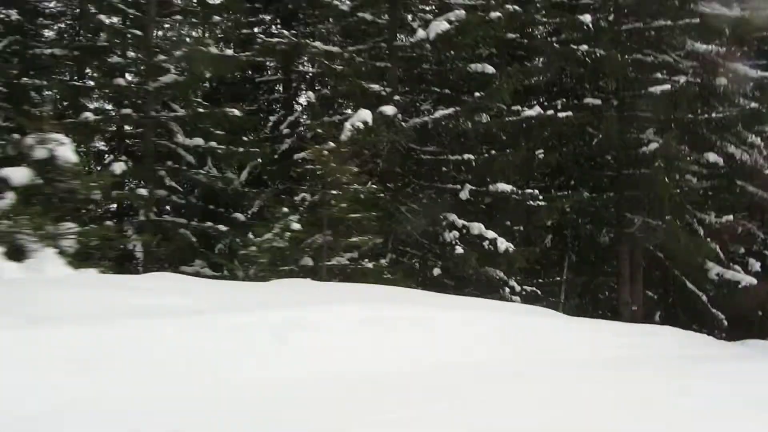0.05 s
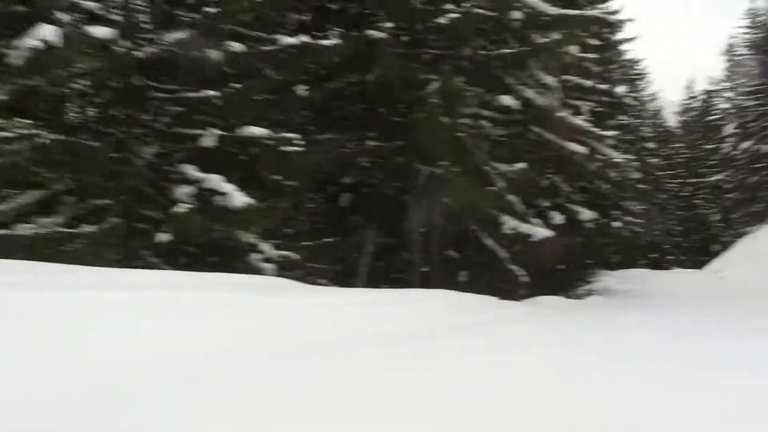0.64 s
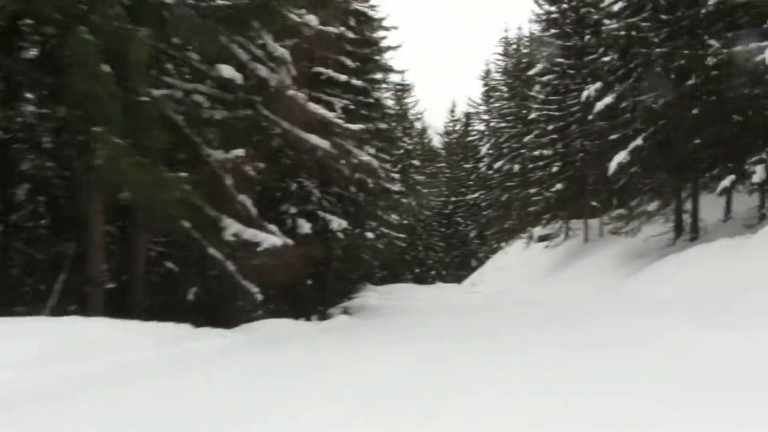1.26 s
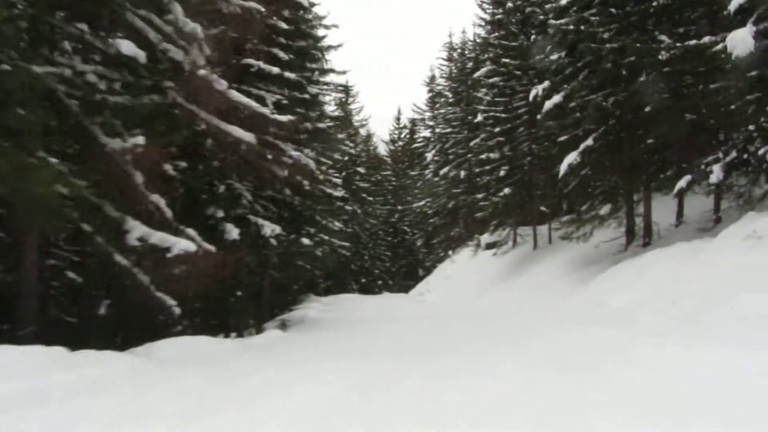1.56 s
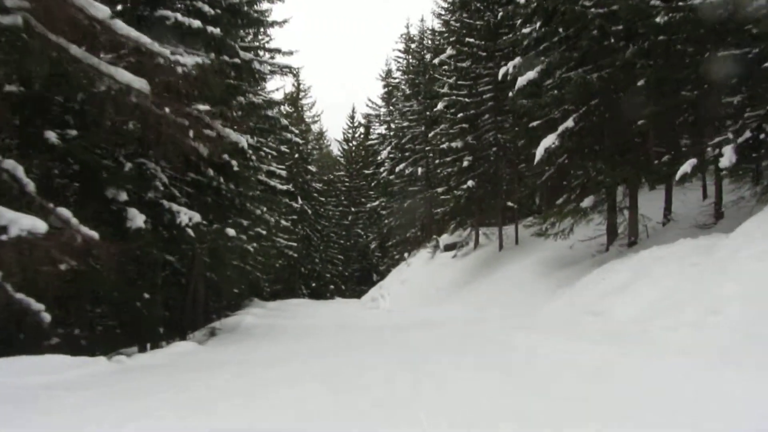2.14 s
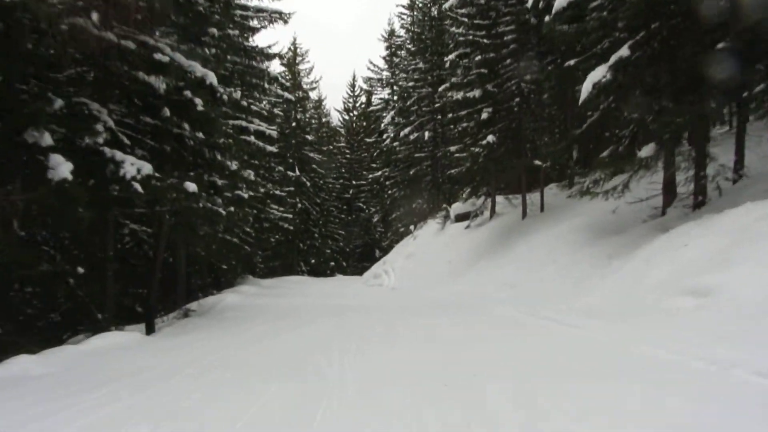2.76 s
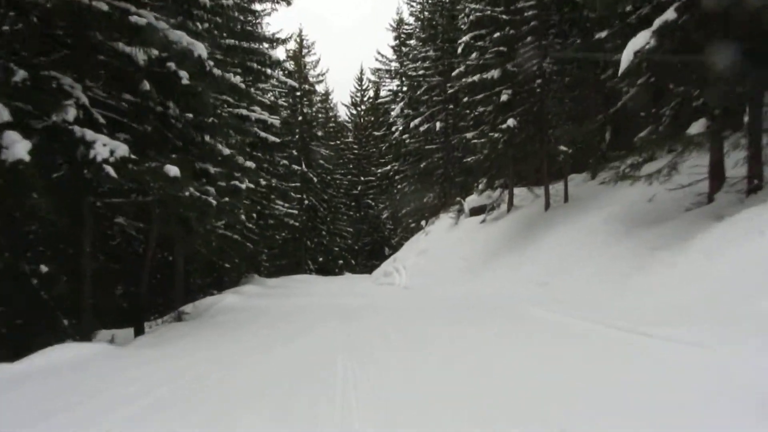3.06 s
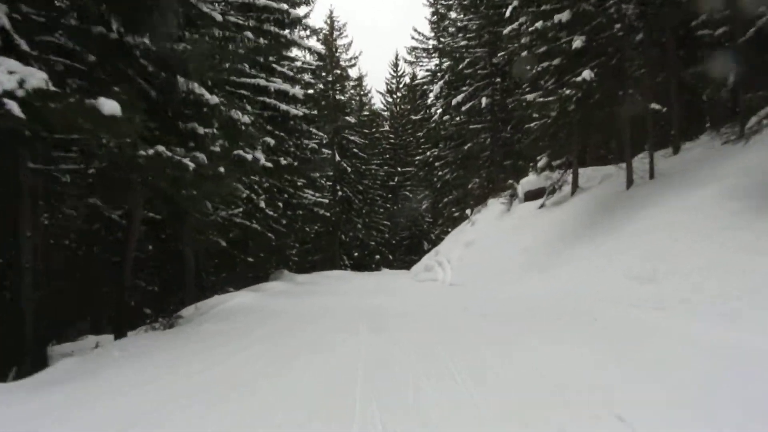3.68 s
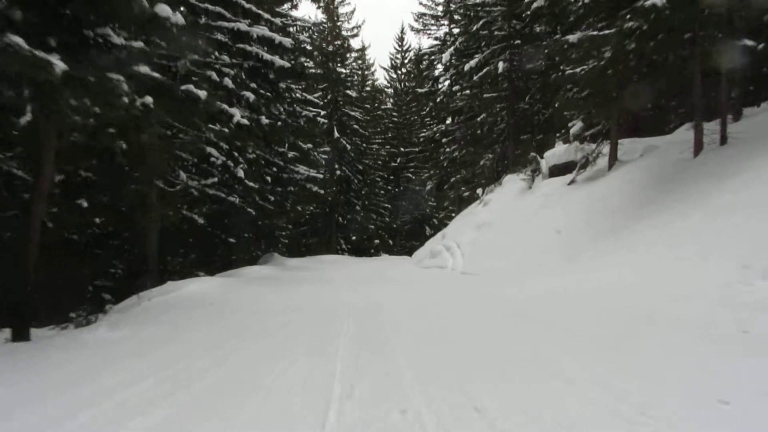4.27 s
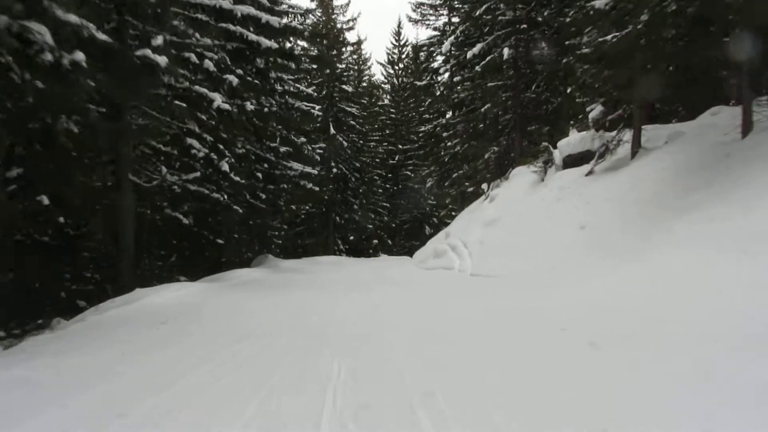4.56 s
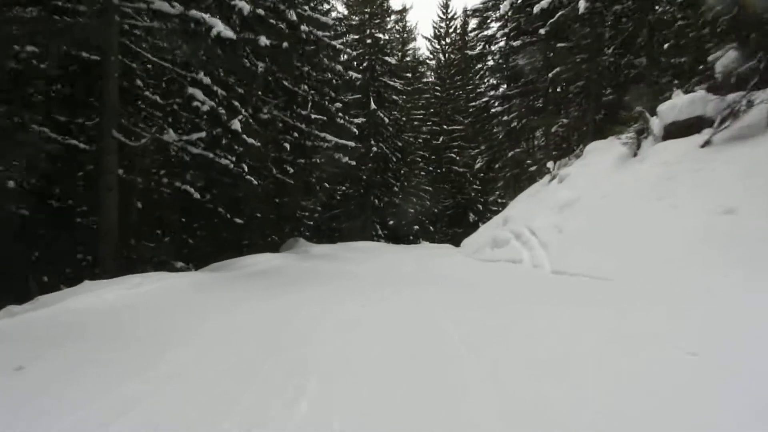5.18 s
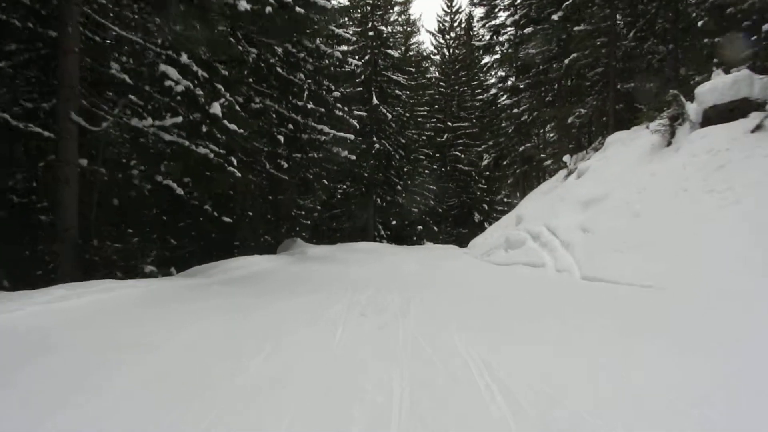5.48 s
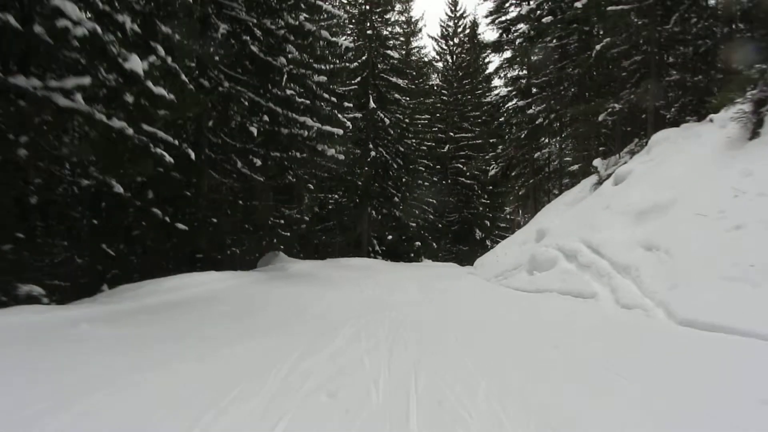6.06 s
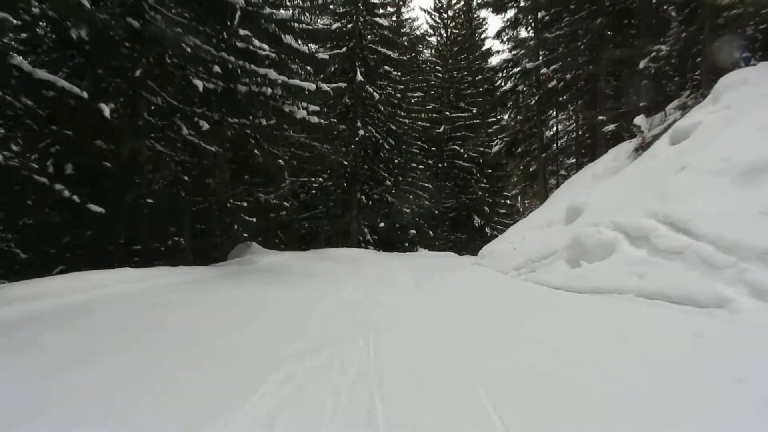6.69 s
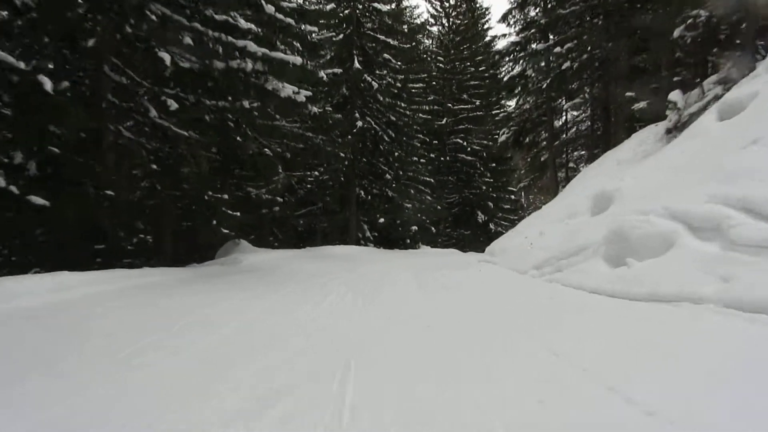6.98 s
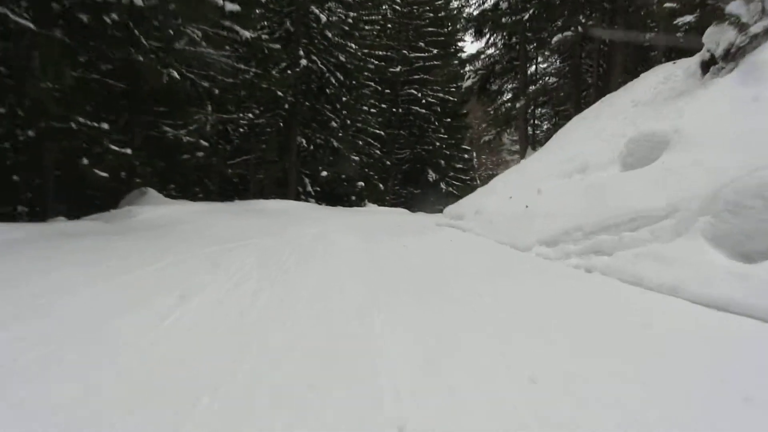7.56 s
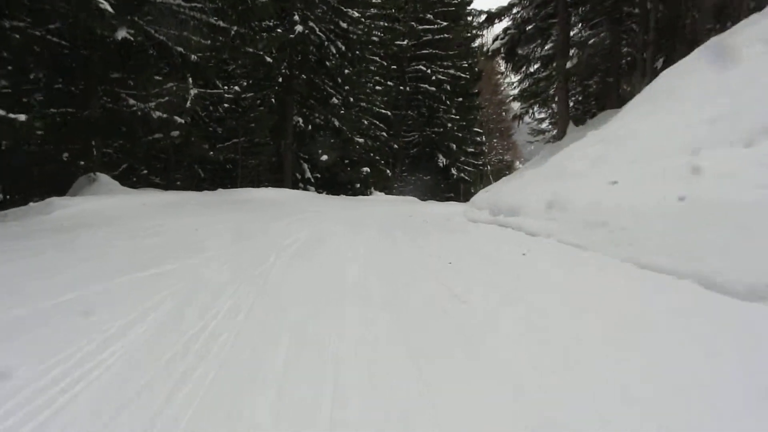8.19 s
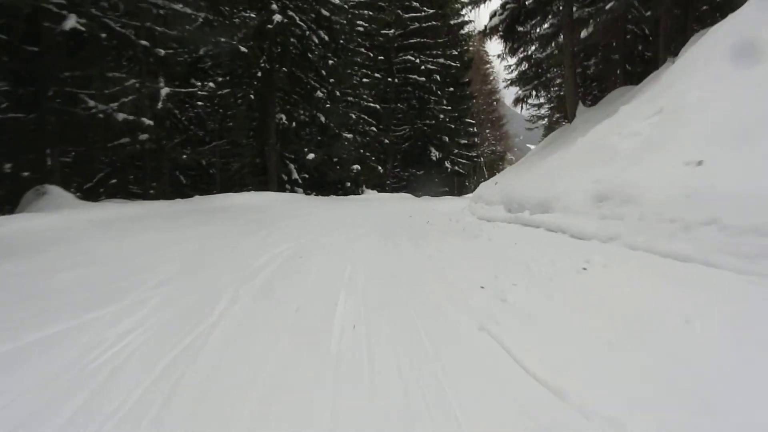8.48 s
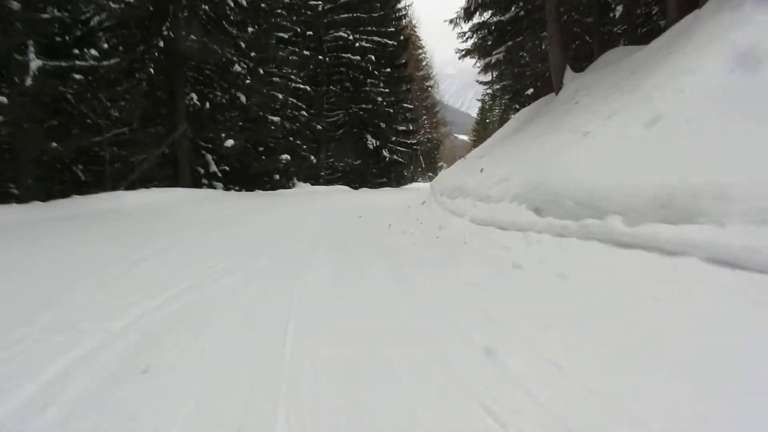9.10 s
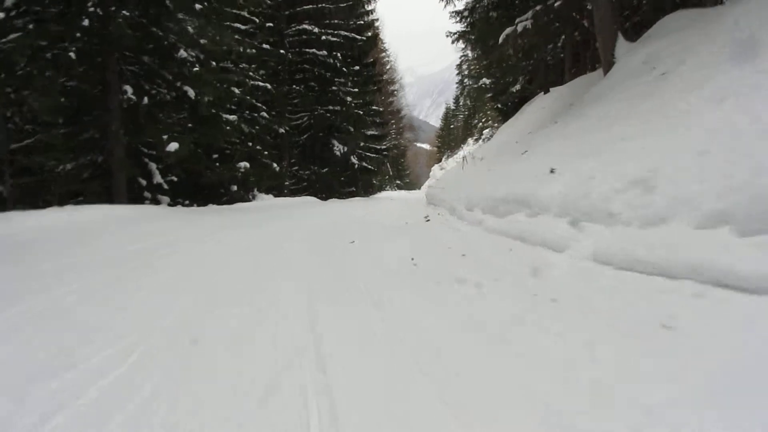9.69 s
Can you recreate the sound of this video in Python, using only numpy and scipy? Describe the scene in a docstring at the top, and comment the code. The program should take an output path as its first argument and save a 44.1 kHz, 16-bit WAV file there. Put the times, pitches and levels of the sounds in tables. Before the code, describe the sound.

Gusty wind buffets the microphone with dull thuds and tearing flutter, over the faint hiss of sled runners gliding on snow.

```python
"""A sled glides down a snowy forest track, its rider holding a camera into the oncoming air.
From the start, eddies break on the microphone in gusts: dull thuds when slow, a tearing flutter when
fast. Far below that the runners hiss, ring faintly and crunch through the snow, with a few ticks of
snapping crust. Just after seven seconds come three thin squeaks. Towards the end the wind turns
duller and the runners grow louder."""
import sys
import numpy as np
from scipy import signal
from scipy.fft import rfft, irfft
from scipy.io import wavfile
from scipy.ndimage import uniform_filter1d, minimum_filter1d

SR = 44100
rng = np.random.default_rng(int(sys.argv[2]) if len(sys.argv) > 2 else 0)


def output_pcm(signal):
    """Save a mono or channel-first signal as 16-bit PCM at the path in sys.argv[1].

    Samples are clipped to [-1, 1] before scaling.
    """
    pcm = np.clip(np.atleast_2d(signal).T, -1, 1) * 32767
    wavfile.write(sys.argv[1], SR, np.round(pcm).astype(np.int16))


N = 433944
TIME = np.arange(N) / SR

# The largest eddies, heard as single pops. Each row: time in seconds, relative size in dB,
# sharpness in Hz, relative amount of flutter around the pop.
LARGE_EDDIES = [(.049, -20, 468, .2), (0.067, -25, 480, 0.17), (0.084, -21.5, 497, 0.28),
                (.1, -18.5, 444, 0.26), (0.245, -1.5, 309, 0.33), (.296, -7.5, 291, 0.83),
                (0.443, -1, 788, 1.1), (0.502, -6.5, 825, 0.57), (0.52, -8, 790, 1), (.533, -11.5, 840, .5),
                (0.581, -5, 628, 0.65), (0.716, -6, 720, 0.84), (.835, -12, 698, .9),
                (0.996, -8, 477, 0.16), (1.208, -9.5, 412, 0.33), (1.221, -7, 396, .2),
                (1.375, -11, 386, 0.25), (1.401, -7.5, 480, .3), (1.475, -6.5, 335, 2.2),
                (1.509, -12.5, 695, .3), (1.548, -11, 538, .2), (1.605, -6.5, 324, 0.18),
                (1.622, -3, 301, 0.22), (1.897, -3.5, 558, 0.51), (1.94, -4.5, 520, 0.41),
                (2.006, -2.5, 594, 0.4), (2.025, -4, 803, 0.55), (2.048, -11.5, 520, 0.67),
                (2.102, -12, 690, .2), (2.382, -11, 540, 0.27), (2.479, -9, 450, .2),
                (2.572, -4.5, 400, 0.097), (2.647, -4, 425, 0.32), (2.655, -9, 510, 0.38),
                (2.748, -10, 362, 0.27), (2.913, -18, 285, 0.6), (2.964, -12.5, 320, 0.46),
                (2.989, -14, 315, 0.46), (3.04, -0.5, 292, 0.34), (3.085, -13, 290, 0.41),
                (3.24, -11.5, 278, 0.14), (3.251, -7, 218, 0.62), (3.336, -3.5, 296, 0.25),
                (3.499, -8, 399, 0.49), (3.565, -3.5, 512, 0.38), (3.596, -0.5, 610, 0.7),
                (3.614, -4.5, 576, 0.33), (3.638, 2, 406, 1.1), (3.672, -11.5, 465, .4),
                (3.714, -6, 473, 0.06), (3.732, -9, 537, 0.17), (3.783, -7, 633, .3),
                (3.857, -5.5, 538, .2), (3.963, -10, 460, 0.28), (4.099, -9.5, 500, .2),
                (4.199, -15, 600, .2), (4.237, -3, 294, 0.34), (4.282, -2.5, 359, 0.25),
                (4.4, -4.5, 473, .3), (4.423, -2.5, 474, 0.12), (4.475, -6, 356, 0.19),
                (4.509, -5.5, 530, .2), (4.545, -8, 460, .3), (4.626, -6.5, 380, .25),
                (4.645, -6.5, 363, 0.28), (4.746, -8, 520, .4), (4.797, -8, 554, .3), (4.839, -4, 470, .2),
                (5.054, -10, 510, 0.24), (5.316, -5, 273, 0.8), (5.391, -8, 368, 0.13),
                (5.478, 0, 308, 1.1), (5.512, -10, 517, .3), (5.683, -2.5, 419, 0.54),
                (5.963, -3.5, 295, 0.77), (6.012, -0.5, 343, 0.37), (6.136, -9.5, 450, 0.18),
                (6.166, -6, 398, 0.16), (6.307, -4, 383, .2), (6.376, 1, 342, 0.19),
                (6.413, -18.5, 595, 0.29), (6.47, -1, 154.3, 1.3), (6.528, -7.5, 336, 0.26),
                (6.593, -0.5, 559, 0.68), (6.662, -9, 463, 0.18), (6.748, -9.5, 265, 1.4),
                (7.015, -8, 398, 0.22), (7.052, -13.5, 407, 0.29), (7.069, -13, 434, .2),
                (7.085, -4.5, 372, 0.19), (7.187, -10.5, 463, 0.54), (7.32, -9, 390, 0.27),
                (7.344, -4.5, 340, 0.58), (7.455, -6, 289, 0.15), (7.477, -2, 350, 0.58),
                (7.517, -10, 378, 0.48), (7.686, -14, 312, 0.54), (7.798, -9.5, 284, 0.76),
                (7.828, -18.5, 418, 1.9), (8.027, -11, 337, 0.23), (8.062, -4.5, 507, 0.2),
                (8.123, -8.5, 263, 0.14), (8.176, -8, 315, 0.25), (8.239, -10, 337, 0.77),
                (8.283, -6, 382, 0.88), (8.298, -6, 372, 0.29), (8.307, -5, 304, 0.48),
                (8.424, -5, 269, 0.43), (8.599, -11, 517, 0.56), (8.617, -8, 415, 0.36),
                (8.677, -9, 500, 0.78), (8.702, -5.5, 430, .6), (8.712, -12, 581, .2),
                (8.753, -11.5, 368, .2), (8.791, -14, 370, 0.17), (8.837, -5, 413, 0.44),
                (8.863, -10.5, 390, 0.22), (8.991, -5.5, 259, 0.51), (9.028, -8, 240, 0.79),
                (9.085, -9.5, 255, 0.64), (9.114, 1, 331, 0.23), (9.231, -1, 174.5, 0.41),
                (9.237, -3.5, 257, 0.14), (9.284, -13, 244, 0.62), (9.358, -9.5, 211, 0.2),
                (9.392, -5.5, 239.7, 1), (9.436, -5, 205, 0.21), (9.454, -9, 322, 0.85),
                (9.511, -10, 350, 0.16), (9.6, -4, 241.4, 0.62), (9.714, -3.5, 210, 0.68),
                (9.742, -10.5, 350, 0.069), (9.784, -8, 310, 0.58)]


def gain_of(db):
    """Decibels as an amplitude factor."""
    return 10 ** (np.asarray(db) / 20)


def unit_rms(x):
    """The signal scaled to an rms of 1."""
    return x / np.sqrt(np.mean(x ** 2) + 1e-20)


def follow(rows):
    """One curve for each column after the time in seconds, with rounded corners."""
    times, *columns = np.transpose(sorted(map(tuple, rows)))
    return [uniform_filter1d(np.interp(TIME, times, column), size=441) for column in columns]


def add(mix, start_s, sound):
    """Mixes a sound in from start_s on."""
    part = mix[..., max(round(start_s * SR), 0):][..., :sound.shape[-1]]
    part += sound[..., :part.shape[-1]]


def bumps(rows):
    """A curve of bells. Each row: middle in seconds, half length in seconds, height."""
    return sum(height * np.exp(-np.minimum(((TIME - s) / half) ** 2, 20)) for s, half, height in rows)


def colour(x, points):
    """Equalises by a curve of (Hz, dB) points."""
    hz, db = np.transpose(points)
    curve_db = np.interp(np.log(np.fft.rfftfreq(N, 1 / SR) + 1), np.log(hz), db)
    return irfft(rfft(x) * gain_of(curve_db), N)


def wander(low_hz, high_hz):
    """A smooth random drift of rms 1, moving between two rates."""
    hz = np.fft.rfftfreq(N, 1 / SR)
    band = hz / np.hypot(hz, low_hz) / (1 + (hz / high_hz) ** 4)
    return unit_rms(irfft(rfft(rng.standard_normal(N)) * band, N))


def stereo(x, same):
    """Two partly alike channels from three signals; the shared one reaches the right a little later."""
    shared = np.array([x[2], np.roll(x[2], 2)])
    return np.sqrt(same) * shared + np.sqrt(1 - same) * x[:2]


def airflow(attack_s=0.022, release_s=0.05, roar_exponent=1.7, lull_dulling=1.3):
    """Wind level and roar share in dB: gusts leap up, hold and die into the headwind; lulls cut in."""
    # The wind between gusts. Each row: time in seconds, level in dB, share of roar above the rumble in dB.
    headwind = [(0.0, -24, -12), (0.06, -27.5, -19), (0.2, -24, -20), (1.0, -18.5, -17.5),
                (2.1, -19, -14.5), (2.18, -24.5, -20.5), (2.65, -17, -11.5), (2.86, -28, -28.5),
                (2.96, -23.5, -26.5), (3.13, -32.5, -23.5), (3.52, -16.5, -27.5), (4.99, -18.5, -14.5),
                (5.4, -19, -28), (6.94, -19.5, -20), (7.43, -27.5, -26), (7.75, -27.5, -38),
                (8.5, -37.5, -24.5), (9.84, -22.5, -37.5)]
    # Gusts on top. Each row: start and length in seconds, level in dB, share of roar in dB,
    # growth from start to end in dB.
    gust_cues = [(0.241, .09, -23.5, -30.5, 3.5), (0.353, 0.08, -15, -10, 8),
                 (0.483, 0.09, -14.5, -6, -3.5), (0.612, 0.038, -19, -8.5, -1),
                 (0.678, 0.044, -14.5, -12.5, 3), (0.761, .04, -17.5, -15, -0.5),
                 (0.814, .05, -20, -6, -2.5), (1.196, 0.09, -22, -8, 0), (1.38, 0.13, -17, -12, 1),
                 (1.546, 0.048, -28, -6, 1.5), (1.664, 0.32, -20.5, -12.5, 6.5),
                 (1.863, 0.11, -20, -15.5, -0.5), (1.996, 0.12, -19.5, -9, -8), (2.288, 0.34, -23, -12, 0),
                 (3.255, 0.054, -22, -25.5, -1.5), (3.459, 0.11, -15.5, -13, 7.5),
                 (3.604, 0.35, -19, -8.5, -2), (4.011, .5, -19, -11, 1), (4.538, 0.31, -21, -9.5, -0.5),
                 (5.118, 0.17, -16, -28.5, 0.5), (5.471, 0.27, -17.5, -16, 1.5),
                 (5.796, 0.17, -14.5, -26, -0.5), (5.993, .41, -20.5, -13.5, -1.5),
                 (6.512, 0.15, -19.5, -14.5, 3), (6.695, 0.16, -25, -10, -2.5), (7.043, 0.042, -13, -15, 0),
                 (7.135, 0.21, -18, -18, -0.5), (7.266, 0.011, -15, -31.5, 1),
                 (7.465, 0.045, -25.5, -15, -3.5), (7.57, 0.098, -27, -14, -1.5),
                 (7.881, 0.045, -24.5, -18, 2), (7.977, 0.125, -19, -20, 0), (8.206, 0.099, -21, -20, 3),
                 (8.372, 0.018, -23, -28.5, 5.5), (8.52, 0.034, -20.5, -25, 5),
                 (8.569, 0.065, -16, -16, 1.5), (8.66, 0.071, -16.5, -18, 1.5),
                 (8.763, 0.099, -19.5, -21, 7.5), (8.942, 0.23, -23.5, -29, 0.5),
                 (9.16, 0.024, -25, -26.5, 2), (9.29, 0.041, -25.5, -34, 5.5),
                 (9.455, 0.18, -18.5, -29.5, 4.5), (9.71, 0.11, -37.5, -20, 2)]
    # The flow slackens and dulls. Each row: middle and half length in seconds, drop in dB (negative lifts).
    lulls = [(.15, 0.014, 0.5), (.595, 0.0099, 4), (.67, 0.013, 3.5), (.745, 0.011, 2.5), (.975, 0.019, 3),
             (1.355, 0.013, 4), (2.2, 0.025, 0.5), (2.255, 0.023, 2), (2.835, 0.023, -1),
             (3.435, 0.018, 0.5), (4.325, 0.019, 2), (5.425, 0.029, 1.5), (5.945, .013, 1.5),
             (6.44, 0.014, 2.5), (6.515, .01, 3.5), (7.3, 0.015, 3.5), (7.43, 0.023, -0.5),
             (7.74, 0.033, 4.5), (8.04, 0.0098, 3), (8.152, 0.014, 1.5), (8.355, 0.012, 2.5),
             (8.51, 0.029, 2.5), (8.648, .017, 1), (8.765, 0.034, 0.5), (8.905, 0.029, 7.5),
             (8.945, .015, 5), (9.055, .014, 9.5), (9.155, 0.014, 2.5), (9.267, .012, 4),
             (9.415, 0.011, 16), (9.68, 0.011, -2)]
    wind_db, share_db = follow(headwind)
    power = gain_of(wind_db) ** 2
    roar = gain_of(wind_db + share_db) ** 2
    for start, length, db, roar_db, growth_db in gust_cues:
        t = np.arange(-attack_s / 2, length + 10 * release_s, 1 / SR)
        envelope = np.clip(t / attack_s + .5, 0, 1) * np.exp(-np.maximum(t - length, 0) / release_s)
        envelope *= gain_of(growth_db * (np.clip(t / length, 0, 1) - .5))
        add(power, start + t[0], (gain_of(db) * envelope) ** 2)
        add(roar, start + t[0], (gain_of(db + roar_db) * envelope ** roar_exponent) ** 2)
    lull_db = bumps(lulls)
    return 10 * np.log10(power) - lull_db, 10 * np.log10(roar / power) - lull_dulling * lull_db


def eddies(at, size, sharp_hz):
    """Each eddy is a bell of pressure centred on a sample: the sharper, the shorter and brighter."""
    lag, middle = np.arange(441), 220
    sharp_hz = np.clip(sharp_hz, 110, 1100)[:, None]
    bells = np.hanning(len(lag)) ** .25 / np.cosh(np.pi ** 2 * sharp_hz * (lag - middle) / SR)
    pressure = np.bincount((at[:, None] + lag).ravel(), (size[:, None] * bells).ravel(), N + len(lag))
    return pressure[middle:][:N]


def mic_port(pressure, cut_hz=88):
    """The microphone's bass cut makes every push swing back, and its port colours the result."""
    # The tone of the port in wind. Each row: frequency in Hz, gain in dB.
    port_tone = [(30, -7.5), (60, 1), (110, 3), (200, 3.5), (350, 2), (700, 1), (1400, 1.5), (2400, 1),
                 (3100, 0), (3900, -6.5), (5000, 0.5), (7000, 5)]
    swing = signal.sosfilt(signal.butter(2, cut_hz, "high", fs=SR, output="sos"), pressure)
    return colour(swing * signal.windows.tukey(N, .001), port_tone)


def gusts(crowding=10, clump_db=1.25, size_db=3.0, push=0.25, surge_db=1.24, level_db=-0.26,
          stall_db=4.5, lead_s=0.0027, stall_s=0.0039):
    """A stream of eddies in clumps: fast air sheds many short ones, slow air sputters."""
    gust_db, roar_db = airflow()
    # The air surges at random, growing stronger and faster together.
    surge = wander(low_hz=6.6, high_hz=23)
    pace_hz = 6400 / np.maximum(8 - roar_db - 0.09 * surge, 5)  # more roar, faster eddies
    at = np.flatnonzero(rng.random(N) < crowding * pace_hz / SR)
    slowness = pace_hz.mean() / pace_hz[at]
    clump = wander(low_hz=26, high_hz=93)[at]
    clump = np.minimum(clump, 2 * np.tanh(clump / 2))  # deep troughs, bounded crests
    spread, polarity = rng.standard_normal((N, 2))[at].T
    # The flow stalls for a moment just before and around each large eddy.
    pop_times = np.transpose(LARGE_EDDIES)[0]
    stall = np.exp(-((TIME[at, None] - pop_times + lead_s) / stall_s) ** 2).max(1)
    sputter_db = clump_db * clump * slowness ** 0.76 + size_db * spread * slowness ** 0.13
    strength = gain_of(sputter_db - stall_db * stall)
    # Stronger eddies are also sharper, most of all in slow air.
    sharpening = np.minimum(strength, 2.6) ** (0.58 * slowness ** 0.14)
    sharp_hz = pace_hz[at] * sharpening / slowness ** 0.29
    stream = mic_port(eddies(at, strength * np.tanh(2 * (push + polarity)), sharp_hz))
    # The gust sets the mean power over a few clumps.
    power = uniform_filter1d(uniform_filter1d(stream ** 2, size=2200), size=1200)
    return stream / np.sqrt(abs(power) + 1e-9) * gain_of(gust_db + surge_db * surge + level_db)


def buffets(level_db=0.5, suck=0.21, lag_s=0.00099, wake_sharpness=0.16,
            flutter_turns=2.5, flutter_db=2, count=12):
    """A large eddy pushes on the port, its wider wake sucks just after, and small ones flap around it."""
    times, db, sharp_hz, flutter = np.transpose(LARGE_EDDIES)
    size = gain_of(db + level_db)
    at = np.round(times * SR).astype(int)
    pressure = eddies(at, size, sharp_hz)
    pressure -= eddies(at + round(lag_s * SR), suck * size, wake_sharpness * sharp_hz)
    for offset, polarity, shape in rng.standard_normal((len(at), count, 3)).transpose(1, 2, 0):
        offset_s = offset * flutter_turns / sharp_hz  # sharper pops flutter more tightly
        near = np.clip(at + np.round(offset_s * SR).astype(int), 0, N - 1)
        share = gain_of(flutter_db) * flutter * np.tanh(2 * polarity) / np.sqrt(count)
        pressure += eddies(near, size * share, sharp_hz * np.exp(0.031 * shape))
    return mic_port(pressure)


def wind(dull_hz=1600, bass_hz=125, bass_trim_db=-2.5):
    """Wind strikes the left port; the right channel gets it inverted, half as strong and duller."""
    # The weight of the low end. Each row: time in seconds, relative bass gain in dB.
    bass_weight = [(0.0, 11.5), (0.4, 2.5), (0.76, 5.5), (1.98, -3), (2.4, 6.5), (4.0, -5.5), (4.6, -1),
                   (5.6, -5.5), (6.5, 0.5), (7.3, 4), (8.6, 4), (9.3, 7.5), (9.84, 4.5)]
    left = gusts() + buffets()
    bass = signal.sosfiltfilt(signal.butter(2, bass_hz, fs=SR, output="sos"), left)
    left += bass * (gain_of(follow(bass_weight)[0] + bass_trim_db) - 1)
    lowpass = signal.butter(1, dull_hz, fs=SR)
    right = -.5 * signal.lfilter(*lowpass, signal.lfilter(*lowpass, left))
    return np.array([left, right])


def friction_db():
    """The drag on the runners, rising briefly on each patch of harder snow."""
    # The steady glide. Each row: time in seconds, friction level in dB.
    glide = [(0.0, -76.5), (0.8, -81), (1.8, -76.5), (2.3, -80.5), (3.8, -77), (6.8, -78), (7.25, -73.5),
             (7.7, -75.5), (8.95, -72.5), (9.5, -69.5), (9.84, -69.5)]
    # Scrapes over harder snow. Each row: middle and half length in seconds, rise in dB.
    scrapes = [(3.867, .02, 4.5), (4.186, 0.027, 6), (4.723, 0.025, 4), (6.068, 0.039, 6.5),
               (6.317, 0.029, 8.5), (7.227, 0.023, 2), (8.468, 0.018, 6), (9.238, 0.026, 4.5),
               (9.35, 0.027, 5), (9.49, 0.022, 4), (9.683, 0.027, 6.5)]
    return follow(glide)[0] + bumps(scrapes)


def runners(level_db=9.5, flicker_db=-0.2, grains_per_s=350, grain_db=-3, patch_db=3, brighten=0.1,
            note_db=-1, width_hz=440, waver_db=0.2, waver_hz=90):
    """Snow shears under the runners as hiss and breaking crystals, and makes them ring faintly."""
    # The tone of sheared snow. Each row: frequency in Hz, gain in dB.
    snow_tone = [(400, -13.5), (1500, 10), (2400, 3.5), (2950, 3.5), (3700, -2), (4600, -1.5), (5400, -1),
                 (6800, -3), (9000, -6), (10300, -10), (11800, -20), (14000, -13), (15800, -26.5)]
    # The note friction draws from the runners. Each row: time in seconds, pitch in Hz,
    # level against the hiss in dB before the note_db trim.
    runner_note = [(0, 5250, -27), (3, 5290, -12.5), (5.5, 5610, -21), (7.3, 5180, -10), (7.5, 5080, -13),
                   (9.1, 4970, -14), (9.84, 5600, -20)]
    drag_db = friction_db()
    friction = gain_of(drag_db + level_db + flicker_db * wander(low_hz=3, high_hz=30))
    grains = (rng.random((3, N)) < grains_per_s / SR) * rng.standard_normal((3, N))
    grains *= gain_of(1.9 * np.minimum(rng.exponential(1, (3, N)), 4))
    shear = stereo(rng.standard_normal((3, N)) + gain_of(grain_db) * unit_rms(grains), same=0.41)
    # Coarse and fine snow alternate, so the hiss darkens and brightens. More drag brightens it too.
    coarse = signal.lfilter(*signal.butter(1, 6500, fs=SR), shear)
    fineness = gain_of(patch_db * wander(low_hz=2.4, high_hz=40) + brighten * (drag_db - drag_db.mean()))
    hiss = colour(coarse / fineness + (shear - coarse) * fineness, snow_tone)
    # The note is a narrow band of noise that wavers as the load on the runners shifts.
    hz, ring_db = follow(runner_note)
    load = wander(low_hz=6.4, high_hz=25)
    carrier = np.cos(2 * np.pi * np.cumsum(hz + waver_hz * load) / SR)
    rub = stereo(rng.standard_normal((3, N)), same=0.8)
    ring = carrier * signal.lfilter(*signal.butter(2, width_hz / 2, fs=SR), rub)
    return friction * (unit_rms(hiss) + gain_of(ring_db + note_db + waver_db * load) * unit_rms(ring))


def crunch(clumps_per_s=70, size_db=4.0, decay_s=0.0032, grains_per_s=2500,
           band_hz=(4200, 9500), level_db=-3):
    """Icy crumbs break under the runners at uneven moments, each in a short spray of grains."""
    breaks = (rng.random(N) < clumps_per_s / SR) * gain_of(size_db * np.minimum(rng.exponential(1, N), 3))
    spray = signal.lfilter([1], [1, -np.exp(-1 / (decay_s * SR))], breaks)
    grains = stereo((rng.random((3, N)) < grains_per_s / SR) * rng.standard_normal((3, N)), same=0.28)
    band = signal.butter(2, band_hz, "band", fs=SR)
    return gain_of(friction_db() + level_db) * unit_rms(signal.lfilter(*band, spray * grains))


def ticks(ring_hz=5190, low_hz=2400):
    """Bits of crust snap: bright puffs that die at once, some ringing a runner."""
    # Each row: start in seconds, level in dB, decay in seconds, left over right in dB,
    # share that rings the runner, upper edge of the puff in Hz.
    snaps = [(.082, -66, .01, -4, 0, 9000), (.245, -60, .003, 1, 0.04, 6000),
             (0.441, -54, 0.0017, 10, 0.94, 8000), (1.119, -62, .003, -4, 0.21, 8000),
             (1.478, -66, .016, 6, 0.3, 7000), (1.776, -62, .002, -2, 0.03, 8000),
             (1.93, -66, 0.0073, -3, 0.89, 6000), (2.972, -57, 0.0019, 1, 0, 8000),
             (3.133, -60, 0.0017, -19, 0.21, 13000), (3.946, -68, 0.017, 6, 0.4, 9000),
             (4.046, -49, 0.0034, -1, 0.19, 5850), (5.841, -59, 0.0032, 3, 0.44, 7500),
             (6.31, -71, .015, -1, 0.15, 11000), (7.708, -61, .003, 9, 0, 13000),
             (8.092, -57, .005, 8, 0, 11000), (8.455, -71, .012, 0, 0.23, 9000),
             (9.03, -61.5, 0.049, 2, 0.67, 9000), (9.355, -58, .004, 0, 0, 14000),
             (9.653, -63, 0.032, 6, 0.45, 13000)]
    out, t = np.zeros((2, N)), np.arange(SR // 5) / SR
    runner_mode = signal.iirpeak(ring_hz, Q=30, fs=SR)
    for start, db, decay, pan_db, ringing, top_hz in snaps:
        band = signal.butter(2, [low_hz, top_hz], "band", fs=SR)
        noise = stereo(rng.standard_normal((3, len(t))), same=0.73)
        puff = unit_rms(signal.lfilter(*band, noise)) * np.exp(-t / decay)
        ring = ringing * unit_rms(signal.lfilter(*runner_mode, noise)) * np.exp(-t / decay / 0.82)
        add(out, start, (puff + ring) * gain_of(db + np.array([[pan_db], [-pan_db]]) / 2))
    return out


def squeaks(waver=.015, width_hz=260):
    """Thin, rough squeals of snow sticking and slipping under a runner."""
    # Each row: start and length in seconds, first and last pitch in Hz, level in dB.
    squeals = [(7.18, .11, 5500, 5600, -73), (7.305, 0.062, 6400, 5900, -74),
               (7.355, 0.054, 5850, 5400, -71)]
    out = np.zeros(N)
    wobble = wander(low_hz=20, high_hz=200)
    grip = wander(low_hz=20, high_hz=width_hz / 2)
    for start, length, first_hz, last_hz, db in squeals:
        n, at = round(length * SR), round(start * SR)
        hz = np.linspace(first_hz, last_hz, n) * (1 + waver * wobble[at:][:n])
        tone = np.sin(2 * np.pi * np.cumsum(hz) / SR)
        add(out, start, gain_of(db) * np.hanning(n) * grip[at:][:n] * tone)
    return out


def scene():
    """Wind on the microphone over the sound of the sled."""
    return wind() + runners() + crunch() + ticks() + squeaks()


def record(dry, hiss_db=-87, ceiling=.77, edge_hz=15750):
    """Faint microphone hiss, a limiter on the biggest buffets, then a steep treble cut."""
    x = dry + gain_of(hiss_db) * rng.standard_normal((2, N))
    needed_gain = np.minimum(1, ceiling / (abs(x).max(0) + 1e-9))
    held_gain = minimum_filter1d(needed_gain, size=301)
    x *= uniform_filter1d(uniform_filter1d(held_gain, size=151), size=151)
    lowpass = signal.firwin(511, edge_hz, window=("kaiser", 9), fs=SR)
    return signal.oaconvolve(x, lowpass[None], "same")


dry = scene()
out = record(dry)
output_pcm(out)
```